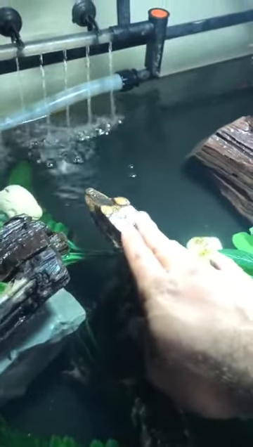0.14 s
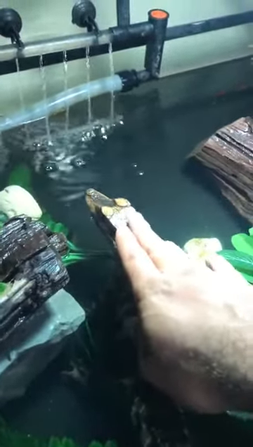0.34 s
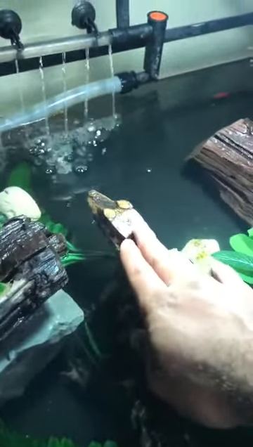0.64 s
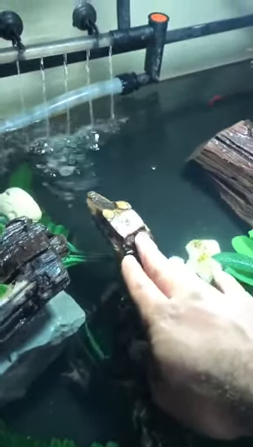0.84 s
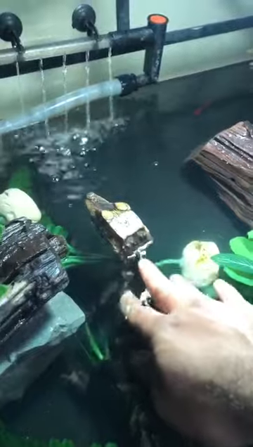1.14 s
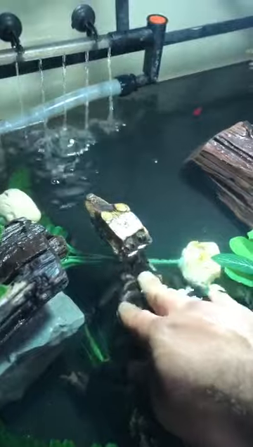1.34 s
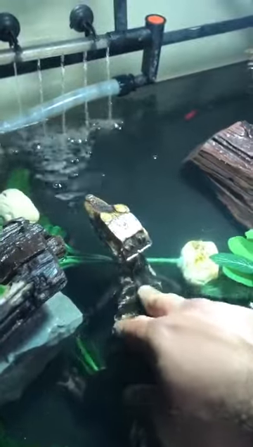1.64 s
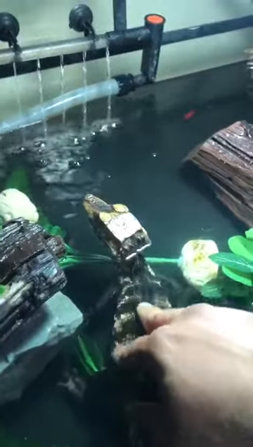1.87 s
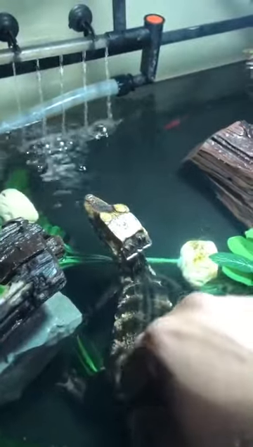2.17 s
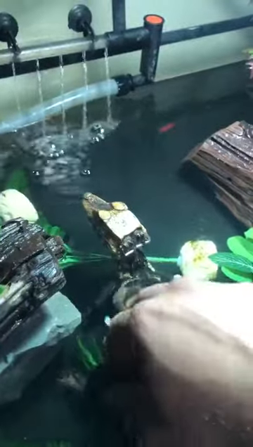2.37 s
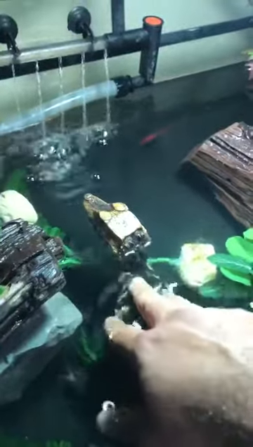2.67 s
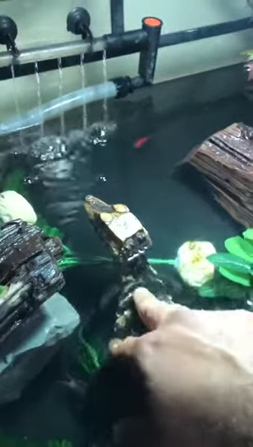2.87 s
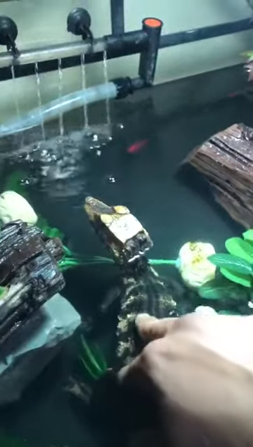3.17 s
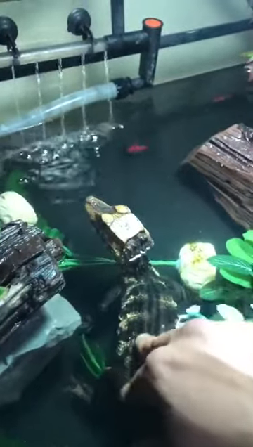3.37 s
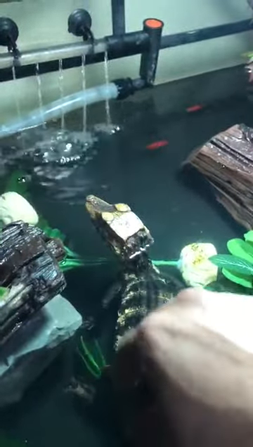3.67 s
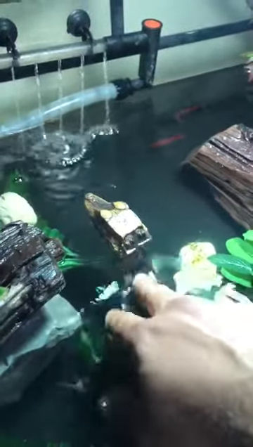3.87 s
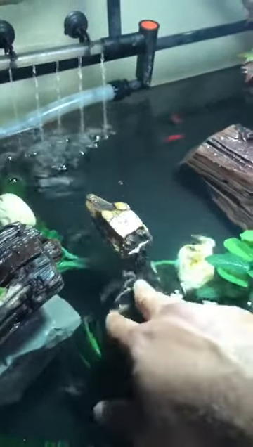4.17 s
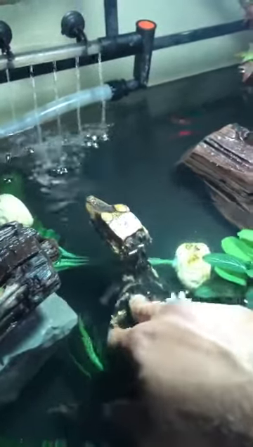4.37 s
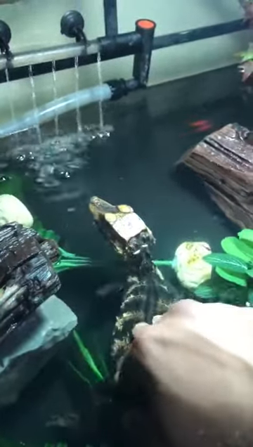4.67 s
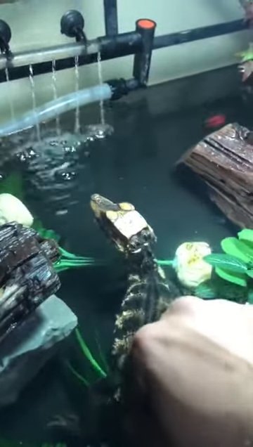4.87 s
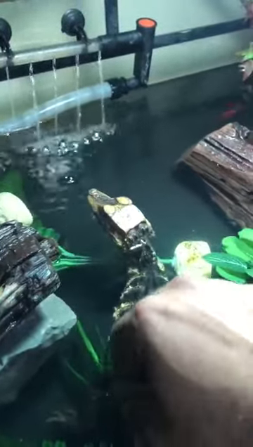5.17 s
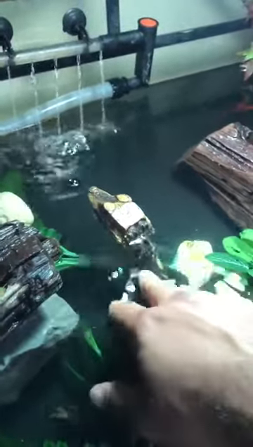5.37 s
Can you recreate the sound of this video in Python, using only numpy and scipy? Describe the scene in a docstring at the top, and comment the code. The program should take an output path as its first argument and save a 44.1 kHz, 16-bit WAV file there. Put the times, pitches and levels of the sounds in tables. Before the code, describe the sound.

Steady bubbly trickling of water into a tank, with low gulps, bright plinks and fine fizz above a soft electrical hum.

```python
"""Water trickling into an indoor tank

Thin streams fall from a filter pipe and drive air under the water, where every trapped bubble rings briefly.
Big bubbles gurgle in gulps, middle-sized ones splash, fine ones fizz, and strong single ones plink.
Landing drops tick and throw up bursts of spray; the tank rings and its walls echo.
Underneath, a mains pump hums as a few steady sines over a soft room rumble of filtered noise."""
import sys
import numpy as np
from scipy import signal
from scipy.fft import rfft, irfft, next_fast_len
from scipy.io import wavfile
from scipy.ndimage import uniform_filter1d, map_coordinates

SR = 44100
rng = np.random.default_rng(int(sys.argv[2]) if len(sys.argv) > 2 else 0)


def generate_wav(sig):
    """Save sig (samples, or channels by samples) to the path in sys.argv[1] as 16-bit PCM at SR."""
    pcm = np.round(np.clip(np.atleast_2d(sig).T, -1, 1) * 32767).astype(np.int16)
    wavfile.write(sys.argv[1], SR, pcm)


N = 243431  # length in samples
WAVER_RATE = 16  # random points a second that shape the wavering of the streams


def amp(db):
    """Decibels to gain."""
    return 10 ** (np.asarray(db) / 20)


def unit(x):
    """x at rms 1."""
    return x / np.sqrt(np.mean(x ** 2) + 1e-20)


def steady(x, seconds):
    """x with its slow swells evened out, at an rms near 1."""
    power = np.abs(uniform_filter1d(x ** 2, max(int(seconds * SR), 1)))
    return x / np.sqrt(power + 1e-12)


def curve(rows):
    """(seconds, value) rows as one value per sample."""
    return np.interp(np.arange(N) / SR, *np.transpose(rows))


def wobble(rate):
    """A smooth random curve through rate random points a second."""
    points = rng.standard_normal(int(N * rate / SR) + 4)
    return map_coordinates(points, [np.arange(N) * rate / SR])


def along(points, hz):
    """(Hz, value) points read on a log frequency axis."""
    f, v = np.transpose(points)
    return np.interp(np.log(hz + 1), np.log(f), v)


def coloured(x, gain_db):
    """Causal (minimum-phase) filter whose gain in dB is a function of frequency."""
    size = 2 * next_fast_len(len(x) // 2 + 8192)
    log_gain = np.log(amp(gain_db(np.fft.rfftfreq(size, 1 / SR))))
    # folding the cepstrum forward in time gives the phase of a filter that never sounds early
    cepstrum = irfft(log_gain)
    cepstrum[1:size // 2] *= 2
    cepstrum[size // 2 + 1:] = 0
    response = np.exp(rfft(cepstrum))
    return irfft(rfft(x, size) * response)[:len(x)]


# Air resonances between the water and the tank walls.
# Each row: centre in Hz, width in Hz, lift in dB at the centre.
TANK_RESONANCES = [(731.5, 35, 11), (783.6, 48, 6.5), (830, 42, 9), (927, 39, 7), (1004, 55, 8),
                   (1156, 59, 3), (1258, 29, 6), (1404, 50, 9), (1514, 43, 7), (1630, 34, 6), (1794, 30, 1),
                   (1930, 18, 0.5), (2036, 54, 4), (2168, 55, 4.5), (2253, 39, 7), (2419, 52, 5),
                   (2976, 35, 3.5), (3610, 22, 6)]


def tank_db(hz):
    """The lift in dB that the tank's resonances together give each frequency."""
    return sum(db / (1 + (2 * (hz - centre) / width) ** 4) for centre, width, db in TANK_RESONANCES)


def ring(t, hz, cycles, rise, attack=0.36):
    """A bubble: a sine that swells over attack cycles, dies over cycles, and climbs as it nears the surface."""
    age = hz * t / cycles
    tone = np.sin(2 * np.pi * hz * t * (1 + rise * age / 2))
    return tone * np.exp(-age) * (1 - np.exp(-hz * t / attack))


def walls(t60, wet_db, build=0.0014):
    """The direct path plus a short echo that builds up (s) and dies (t60, s), new for each spot on the water."""
    t = np.arange(SR // 5) / SR
    echo = rng.standard_normal(len(t)) * amp(-60 * t / t60) * (1 - np.exp(-t / build))
    echo *= amp(wet_db) / np.linalg.norm(echo)
    echo[0] = 1  # the direct path
    return echo / np.linalg.norm(echo)


def swarm(rate, centre_hz, octaves, cycles, spread_db, t60, wet_db, count=12):
    """Random bubbles, rate a second, pitched over octaves around centre_hz, at count spots on the water; rms 1."""
    lowest_hz = np.min(centre_hz) * 2 ** (-octaves / 2)
    t = np.arange(int(6 * cycles / lowest_hz * SR)) / SR
    lead = SR // 5
    water = np.zeros(N)
    for spot in range(count):
        when, pitch, faintness = rng.random((int(rate * N / SR / count), 3)).T
        start = (when * N).astype(int)
        hz = np.broadcast_to(centre_hz, N)[start] * 2 ** (octaves * (pitch - .5))
        # most bubbles are faint, a few are strong
        gain = amp(-spread_db * np.log(0.043 + faintness))
        grains = gain[:, None] * ring(t, hz[:, None], cycles, rise=0.03)
        # bubbles and echoes that run past the end wrap round to the start
        places = (start[:, None] + np.arange(len(t))) % N
        train = np.bincount(places.ravel(), grains.ravel(), N)
        echoed = signal.fftconvolve(np.pad(train, (lead, 0), "wrap"), walls(t60, wet_db))
        water += echoed[lead:][:N]
    return unit(water)


# Tone of the room rumble. Each row: frequency in Hz, strength in dB per Hz before the overall level is set.
ROOM_COLOUR = [(20, -24), (38, -25), (52, -10.5), (90, 0), (125, -4), (240, -1), (280, -5.5), (370, -0.5),
               (450, -9), (540, -5.5), (700, 2.5), (2000, -34.5), (12000, -15.5)]


def room():
    """Soft room rumble: steady noise filtered to the room's colour."""
    rumble = coloured(rng.standard_normal(N), lambda hz: along(ROOM_COLOUR, hz))
    return amp(-50.5) * unit(rumble)


# Steady tones of the pump. Each row: frequency in Hz, rms level in dB.
PUMP_TONES = [(100, -55.5), (200, -71.5), (400, -59)]


def pump():
    """Mains hum: a few steady sines, each starting at a random point of its cycle."""
    t = np.arange(N) / SR
    hum = np.zeros(N)
    for hz, db in PUMP_TONES:
        hum += amp(db) * np.sqrt(2) * np.sin(2 * np.pi * (hz * t + rng.random()))
    return hum


# Overall colour of the finest bubbles. Each row: frequency in Hz, gain in dB before levelling.
FIZZ_COLOUR = [(1500, -67), (3500, -1.5), (4700, -5.5), (6500, -1), (8500, 3.5), (11000, 5), (12100, -1)]


def fizz():
    """Fine bubbles ring high and close together, so they blur into a fizz."""
    bubbles = swarm(rate=1300, centre_hz=7022, octaves=1.67, cycles=11.8, spread_db=4.5, t60=0.13, wet_db=3.5)
    return steady(coloured(bubbles, lambda hz: along(FIZZ_COLOUR, hz)), seconds=0.086)


# Colour of the landing drops. Each row: frequency in Hz, gain in dB before levelling.
TICK_COLOUR = [(550, -26.5), (1300, 1), (3000, -2), (7000, -2.5), (11000, 2), (12500, -7)]


def ticks():
    """Landing drops: rings that fade within about a cycle, so they click more than sing."""
    drops = swarm(rate=110, centre_hz=3850, octaves=1.85, cycles=0.62, spread_db=4.5, t60=0.089, wet_db=12.5)
    return steady(coloured(drops, lambda hz: along(TICK_COLOUR, hz)), seconds=0.06)


def patter(drop_rate=37, burst_s=0.014, burst_db=5.5):
    """Gain of the spray, rms 1: drops break off the streams, and it jumps as each lands, then dies back."""
    when, size = rng.random((int(drop_rate * N / SR), 2)).T
    landings = np.bincount((when * N).astype(int), size, N)
    bursts = signal.lfilter([1], [1, -np.exp(-1 / (burst_s * SR))], landings)
    return unit(1 + amp(burst_db) * bursts)


# Rise and fall of the spray. Each row: time in seconds, level in dB applied to the mix of fizz and ticks.
SPRAY_CURVE = [(0, -39), (0.25, -40), (0.45, -37.5), (0.9, -39.5), (1.18, -37.5), (1.36, -42),
               (1.65, -41.5), (2.03, -38), (2.4, -39.5), (2.9, -38), (3.25, -37.5), (3.58, -42.5),
               (3.82, -36.5), (4.2, -39.5), (4.6, -40.5), (4.84, -40.5), (4.97, -38), (5.5, -40)]


def spray():
    """Fine bubbles and drop ticks burst together as drops land."""
    mix = amp(-4.0) * fizz() + amp(-6.5) * ticks()
    return amp(curve(SPRAY_CURVE)) * patter() * mix


# Overall colour of the middle-sized bubbles. Each row: frequency in Hz, gain in dB before levelling.
SPLASH_COLOUR = [(500, -48.5), (900, 6.5), (1150, -4.5), (1700, -3), (2400, 2), (3600, 1), (4500, -7.5),
                 (7000, 2.5)]
# Rise and fall of the splash. Each row: time in seconds, level in dB before the random waver.
SPLASH_CURVE = [(0, -35.5), (0.4, -37), (0.77, -36.5), (1.0, -39), (1.2, -36), (1.45, -36), (1.98, -37),
                (2.12, -36), (2.4, -37.3), (2.95, -36.5), (3.35, -37), (3.97, -39), (4.1, -34.5),
                (4.22, -38.5), (4.52, -35.5), (4.84, -36.5), (5.0, -38.5), (5.5, -37)]


def splash(waver_db=0.5):
    """Middle-sized bubbles over a wide range of pitch, ringing through the tank and wavering a little."""
    bubbles = swarm(rate=1000, centre_hz=2449, octaves=2.51, cycles=6.6, spread_db=5.0, t60=0.23, wet_db=3)
    bubbles = coloured(bubbles, lambda hz: along(SPLASH_COLOUR, hz) + tank_db(hz))
    level_db = curve(SPLASH_CURVE) + waver_db * wobble(WAVER_RATE)
    return amp(level_db) * steady(bubbles, seconds=0.062)


# The loudest single bubbles.
# Each row: start in seconds, starting pitch in Hz, level in dB (all its energy counted within one short burst).
SINGLE_BUBBLES = [(0.037, 2260, -32), (0.141, 5320, -33), (0.337, 3750, -33.5), (0.392, 6940, -33),
                  (0.484, 10400, -35), (0.612, 1370, -31.5), (0.626, 5800, -28.5), (0.65, 5640, -35),
                  (0.758, 3740, -26), (0.765, 3520, -28.5), (0.848, 770, -25), (0.85, 5740, -32.5),
                  (0.914, 4960, -36), (1.037, 10700, -35.5), (1.153, 1660, -31.5), (1.174, 5570, -31.5),
                  (1.181, 1000, -28), (1.2, 1950, -33), (1.29, 820, -29), (1.356, 2520, -36),
                  (1.436, 2340, -29), (1.49, 950, -31.5), (1.716, 2100, -31), (1.748, 4170, -32.5),
                  (2.024, 9100, -34), (2.05, 1060, -29.5), (2.139, 10800, -35.5), (2.143, 1530, -33),
                  (2.194, 970, -28.5), (2.204, 3780, -33), (2.217, 6300, -35.5), (2.263, 6420, -35),
                  (2.443, 765, -28.5), (2.452, 7000, -35), (2.551, 960, -26.5), (2.615, 810, -28.5),
                  (2.896, 1470, -30.5), (3.136, 3300, -33.5), (3.146, 920, -29.5), (3.198, 8080, -35),
                  (3.206, 1970, -31.5), (3.238, 960, -28.5), (3.243, 3340, -33.5), (3.268, 775, -22),
                  (3.27, 2350, -29.5), (3.345, 3140, -34.5), (3.451, 6030, -34.5), (3.659, 2100, -31),
                  (3.891, 6760, -35.5), (3.984, 824, -27.5), (4.036, 5060, -35.5), (4.05, 960, -28),
                  (4.114, 2450, -27), (4.256, 764, -25), (4.28, 8960, -36), (4.458, 6100, -36),
                  (4.508, 960, -25.5), (4.686, 1290, -33.5), (4.712, 2380, -32), (4.84, 1190, -33.5),
                  (4.951, 7540, -30.5), (5.08, 5470, -34), (5.19, 800, -28), (5.456, 10270, -35.5)]
# The tank carries little below its lowest resonance. Each row: frequency in Hz, gain in dB.
TANK_LOW_EDGE = [(480, -46), (650, -7.5), (720, -5)]


def plinks(cycles=2.7, rise=0.01, attack=0.61, t60=0.074, wet_db=1, wet_db_per_octave=4.0, drier=0.6,
           usual_db=-31, burst_s=0.0076):
    """Single strong bubbles, each with the wall echo of its own spot and the tank's ring."""
    out, t = np.zeros(N + SR), np.arange(SR // 5) / SR
    for s, hz, db in SINGLE_BUBBLES:
        # the walls throw back more of a high ring than of a low one
        echo_db = wet_db + wet_db_per_octave * np.log2(hz / 2000)
        # louder bubbles are nearer, so drier
        echo_db -= drier * (db - usual_db)
        bubble = ring(t, hz, cycles, rise, attack)
        plink = signal.fftconvolve(bubble, walls(t60, echo_db))[:len(t)]
        plink = coloured(plink, lambda f: tank_db(f) + along(TANK_LOW_EDGE, f))
        gain = amp(db) * np.sqrt(burst_s * SR) / np.linalg.norm(plink)
        out[int(s * SR):][:len(t)] += gain * plink
    return out[:N]


# Gulps, in which a stream drags a pocket of air under as big bubbles.
# Each row: middle in seconds, length in seconds, level in dB before the waver, note in Hz that it pulls towards.
GULP_EVENTS = [(0.158, 0.084, -33.5, 873), (0.305, .12, -32.5, 869), (0.462, 0.054, -34, 834),
               (0.583, 0.062, -35, 817), (0.874, 0.062, -34.5, 837), (1.244, .08, -36.5, 930),
               (1.528, 0.085, -34.5, 817), (1.615, .08, -32, 845), (1.854, 0.074, -36, 822),
               (2.094, 0.042, -31, 803), (2.232, 0.092, -41, 965), (2.48, 0.11, -34.5, 795),
               (2.596, 0.14, -33.5, 817), (2.836, .04, -38, 830), (2.944, 0.046, -33.5, 767),
               (3.023, 0.073, -35.5, 842), (3.244, 0.085, -31.5, 818), (3.437, 0.043, -33.5, 910),
               (3.527, 0.042, -33, 776), (3.685, 0.028, -39, 830), (3.792, 0.069, -38, 828),
               (3.988, 0.12, -34, 793), (4.268, 0.05, -36, 786), (4.367, 0.053, -36, 970),
               (4.47, 0.042, -32, 868), (4.722, 0.091, -31.5, 824), (4.977, 0.14, -38, 766),
               (5.25, 0.035, -37.5, 858), (5.402, .14, -35, 812)]


def gulping(simmer_db=-38, simmer_hz=834.7, drift_octaves=0.067):
    """Level (dB) and note (Hz) of the gurgle: each gulp swells, fades and pulls the drifting note towards its own."""
    t = np.arange(N) / SR
    # between gulps the gurgle simmers on
    power = np.full(N, amp(simmer_db) ** 2)
    pull = power * simmer_hz
    for s, length, db, hz in GULP_EVENTS:
        gulp = amp(db) ** 2 * np.exp(-(2 * (t - s) / length) ** 2)
        power = power + gulp
        pull = pull + gulp * hz
    drift = 2 ** (drift_octaves * wobble(WAVER_RATE))
    return 10 * np.log10(power), pull / power * drift


# Overall colour of the big bubbles. Each row: frequency in Hz, gain in dB before levelling.
GURGLE_COLOUR = [(350, -62.5), (540, -12), (670, -5.5), (722, 3), (830, -0.5), (875, -7), (930, -0.5),
                 (1030, 0.5), (1150, -8), (1600, -21.5)]


def gurgle(waver_db=1.0):
    """Big bubbles ring low around the gulps' note and swell with the trapped air, through the tank."""
    gulp_db, note_hz = gulping()
    bubbles = swarm(rate=130, centre_hz=note_hz, octaves=0.359, cycles=11.5, spread_db=1.5, t60=0.17, wet_db=-4)
    bubbles = coloured(bubbles, lambda hz: along(GURGLE_COLOUR, hz) + tank_db(hz))
    level_db = gulp_db + waver_db * wobble(WAVER_RATE)
    return amp(level_db) * steady(bubbles, seconds=0.031)


def scene():
    """Room, pump and water added together in one channel."""
    background = room() + pump()
    water = spray() + splash() + plinks() + gurgle()
    return (background + water)[None]


def record(dry, top_hz=12050, slope_hz=300):
    """The treble ends at a band limit: the gain falls in a straight line to nothing around top_hz."""
    size = next_fast_len(N + SR // 2)
    hz = np.fft.rfftfreq(size, 1 / SR)
    gain = np.clip((top_hz - hz) / slope_hz + .5, 0, 1)
    return irfft(rfft(dry, size) * gain, size)[:, :N]


dry = scene()
out = record(dry)
generate_wav(out)
```